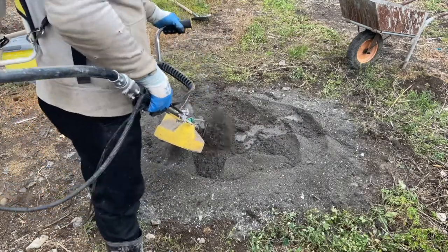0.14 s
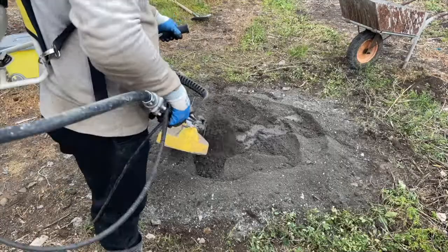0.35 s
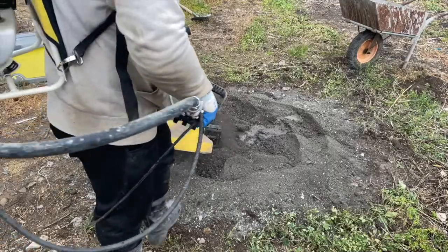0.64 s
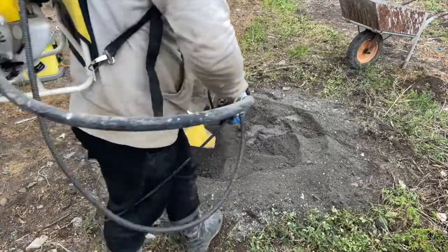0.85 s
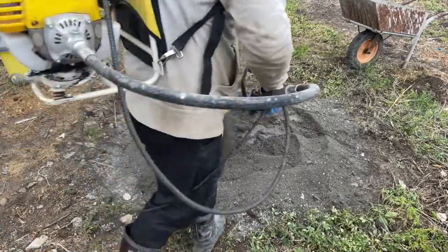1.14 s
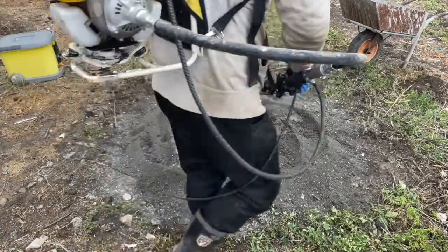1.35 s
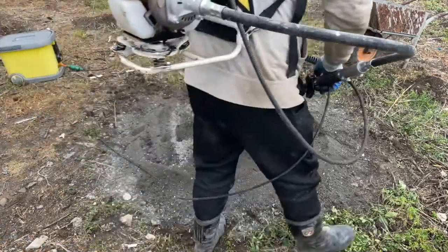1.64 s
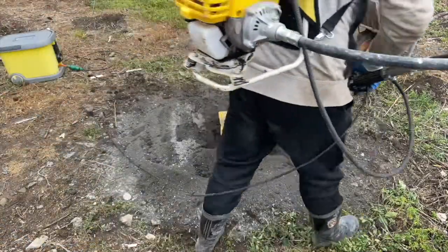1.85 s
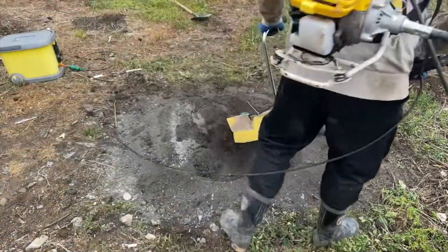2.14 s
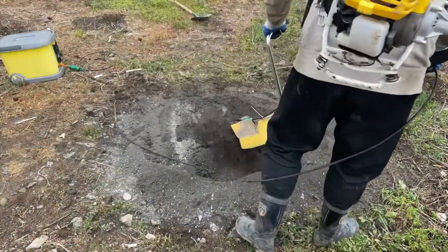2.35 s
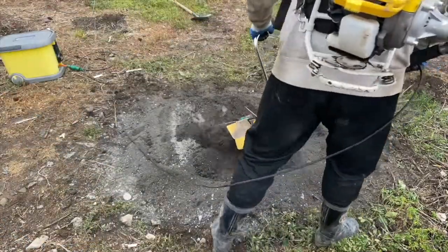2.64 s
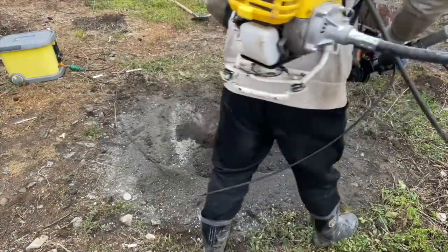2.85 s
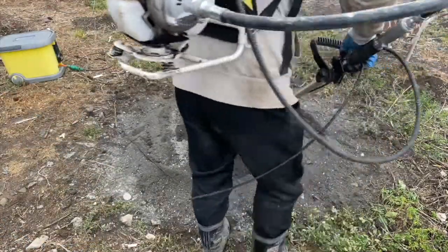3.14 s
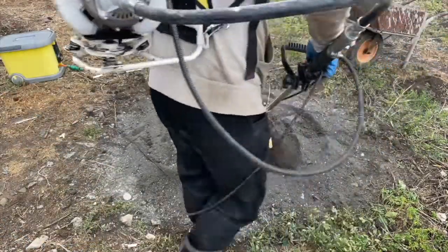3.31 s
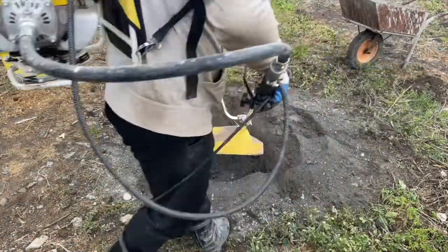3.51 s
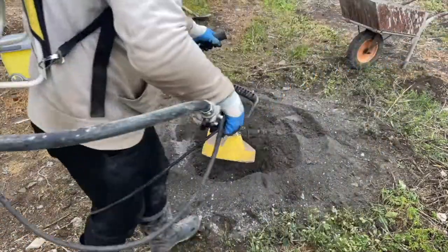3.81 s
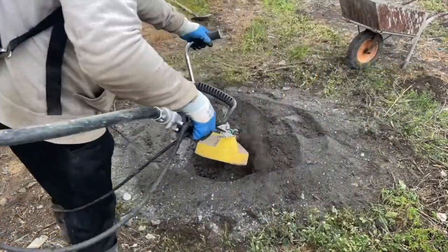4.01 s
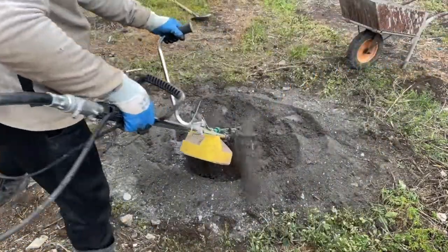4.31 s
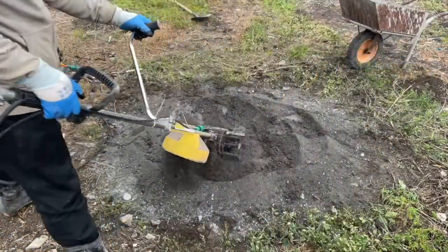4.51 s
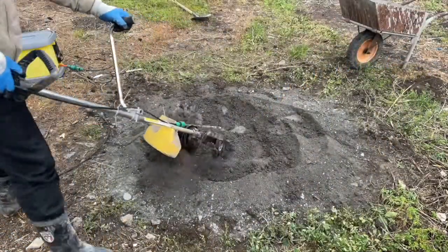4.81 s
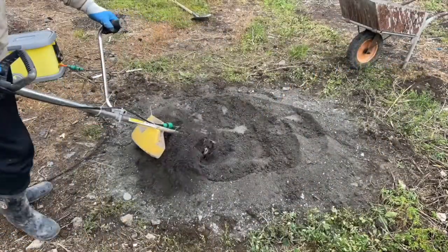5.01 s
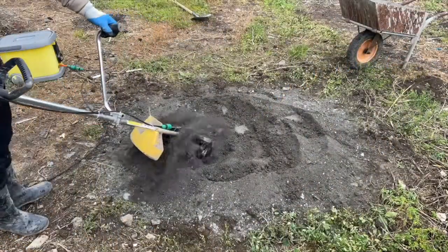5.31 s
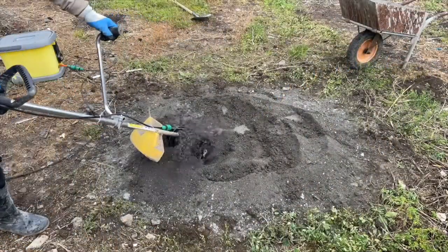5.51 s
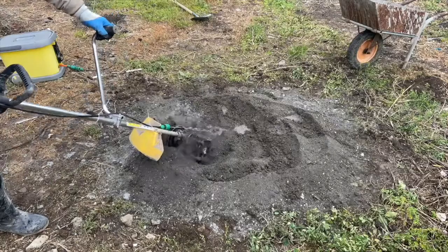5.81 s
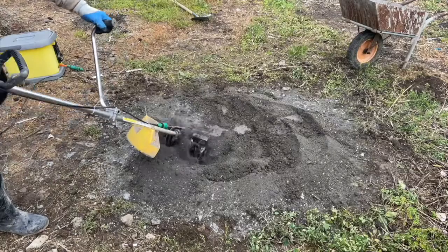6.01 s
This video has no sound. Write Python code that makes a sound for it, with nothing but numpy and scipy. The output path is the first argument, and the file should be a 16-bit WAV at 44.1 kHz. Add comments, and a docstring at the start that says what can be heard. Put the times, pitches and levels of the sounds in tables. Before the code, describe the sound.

A small four-stroke petrol engine on a backpack brush cutter runs for the whole six seconds, outdoors and close to a single microphone. From the start there is a buzzing, rapidly pulsing exhaust over a low rumble, its pitch wavering only slightly under load. Underneath, tiller tines churn dry cement and gravel, making a dense gritty hiss. From about 1 to 3 seconds the engine turns toward the microphone, and fast valve ticking, ringing metal clatter and a thin gear whine come forward, while the grit is at its strongest. Between about 3 and 4 seconds the machine turns away and moves off a little, so the clatter and churning soften and the overall sound gets quieter. From 4 seconds to the end the exhaust drone dominates, a touch higher in pitch, with lighter rattle and the continuing spray of grit.

```python
"""Outdoors, on dry cement and gravel, 0.7 to 1.8 m from a backpack four-stroke brush cutter; one microphone.
The engine drives a tiller head whose tines churn the grit. Each firing rings the muffler and shakes
the frame; valves and piston clatter in the casing; the gears whine. Close in, the worker turns the
engine towards the microphone, then turns it away and steps off, leaving mostly exhaust and grit."""
import sys
import numpy as np
from scipy import signal
from scipy.fft import rfft, irfft, next_fast_len
from scipy.io import wavfile
from scipy.ndimage import uniform_filter1d

SR = 44100
rng = np.random.default_rng(int(sys.argv[2]) if len(sys.argv) > 2 else 0)


def transcribe(signal):
    """Save signal, clipped to [-1, 1], as a 16-bit WAV file at the path in sys.argv[1]."""
    frames = np.atleast_2d(signal).T
    limited = np.clip(frames, -1, 1)
    pcm = np.round(limited * 32767).astype(np.int16)
    wavfile.write(sys.argv[1], SR, pcm)


N = 271215

# Engine speed, sagging as the tines bite. Each row: time in seconds, firing rate in Hz.
ENGINE_SPEED = [(0.0, 44.82), (0.05, 45.48), (0.2, 45.86), (0.49, 47.58), (0.67, 47.11), (0.79, 46.34),
                (0.96, 46.6), (1.08, 47.02), (1.45, 48.1), (1.75, 46.7), (2.23, 47.44), (2.57, 46.3),
                (3.01, 48.27), (3.15, 47.07), (3.87, 48.93), (4.45, 49.09), (4.68, 47.86), (4.86, 48.86),
                (5.07, 47.43), (5.58, 48.17), (5.72, 47.63), (6.15, 47.24)]
# The worker's path. Each row: time in seconds, engine to microphone in metres, turn in degrees
# (0 = side on, 90 = back to the microphone).
WORKER_PATH = [(0, 0.86, -8.5), (.56, 0.89, 8.5), (1.1, 0.84, 28.5), (1.4, 0.72, 47), (1.85, 0.77, 64.5),
               (2.35, 0.74, 97.5), (2.8, 0.91, 75.5), (3.1, 0.97, 62.5), (3.35, 1.26, 43),
               (3.7, 1.61, 16.5), (4.2, 1.44, 6), (4.75, 1.82, -3), (5.3, 1.73, -8), (5.6, 1.63, -0.5),
               (6.15, 1.57, -2.5)]
# The beam of each named engine part. Each entry: gain in dB at 1 m, power of distance it fades with,
# extra dB on axis, direction in degrees, width in degrees.
PART_BEAMS = { "muffler": (-44, 1.5, 6.5, -6, 62), "tailpipe": (-55, 2.2, 12, -4.5, 59.5),
              "outlet": (-60.5, 0.75, 18.5, 12, 34.5), "pop": (-58.5, 0.9, 13.5, 5, 31.5),
              "shaft": (-51, 1.5, 3, 5, 12.5), "crankcase": (-57.5, 3.5, 6, 87, 13),
              "panels": (-38, 1.26, 3, 4, 8.5), "block": (-51.5, 2.5, 14, 20, 23.5),
              "cover": (-50.5, 2, 16.5, 89, 21.5), "housing": (-53.5, 2.5, 13, 73.5, 31),
              "valves": (-47.5, 1.45, 12.5, 42, 48), "gears": (-52, 1, 8.5, 7, 5.5)}

# The frame shaking at 1, 2 and 3 times the firing rate. Each row: a beam as in PART_BEAMS.
SHAKE_BEAMS = [(-50.5, 0.68, 7.5, -19, 21), (-39, 1.05, 5, -16, 5.9), (-40, 1.1, -5, -14, 25)]
# The flexible shaft's rumble at the microphone. Each row: time in seconds, level in dB.
RUMBLE_LEVEL = [(0, -47), (.3, -40), (.55, -44), (.95, -43), (1.4, -41), (1.85, -42), (2.2, -44),
                (2.6, -46), (3.1, -52), (3.6, -49), (4.1, -49), (4.6, -49), (4.85, -54.5), (5.2, -47.5),
                (6.15, -52)]
# Spectra of that rumble and of a firing's five voices. Each row: frequency in Hz, relative level in dB.
RUMBLE_SPECTRUM = [(25, -33), (45, -6.5), (65, 1), (115, 4.5), (160, 3.5), (210, -7.5), (400, -39.5),
                   (900, -37)]
MUFFLER_SPECTRUM = [(133, -40), (190, -14.5), (237, 0.5), (285, -3.5), (335, -6), (385, -38), (520, -27.5),
                    (728, -48.5)]
TAILPIPE_SPECTRUM = [(200, -50.5), (285, -33), (335, 1), (380, -1), (420, 1.5), (470, -3.5), (520, -21.5),
                     (565, -7), (615, -28), (670, -5), (800, -30.5), (1120, -67.5)]
OUTLET_SPECTRUM = [(434, -62), (620, -42), (675, -10), (715, -2.5), (762, 3), (785, -4.5), (815, -22.5),
                   (860, -12), (905, -5), (950, -4.5), (1000, -13), (1400, -27.5)]
POP_SPECTRUM = [(266, -53), (380, -34.5), (435, -12), (520, -0.5), (620, -30), (760, -0.5), (860, -15.5),
                (950, -13), (1100, -4.5), (1200, -9), (1400, -26), (1960, -47.5)]
CRANKCASE_SPECTRUM = [(133, -34), (190, -9.5), (285, -15), (380, -10), (470, -15), (530, -9.5), (580, -8),
                      (680, -9.5), (780, -16.5), (880, -2.5), (1050, -10), (1400, -14), (1960, -25.5)]
# Lift of the bright exhaust pop. Each row: time in seconds, extra gain in dB.
POP_LIFT = [(0, 0.5), (4.1, 2), (4.45, 1.5), (4.65, 2.5), (4.85, 4), (4.96, 0), (6.15, 0.5)]
# A hollow in the exhaust, shifting as the worker turns. Each row: time in seconds, centre in Hz,
# depth in dB.
EXHAUST_DIP = [(0, 338, 27), (.25, 349, 26), (.45, 364, 17), (1.1, 385.5, 6), (1.6, 390.4, 2.5),
               (2.6, 417, 0), (3.7, 374, 4.5), (4.4, 389.9, 13), (4.7, 359.8, 13), (6.15, 360.8, 15)]

# Valve and piston knocks. Each row: place as a share of the engine cycle, relative level in dB.
CYCLE_KNOCKS = [(.06, 5), (0.131, -16), (.37, -2), (.56, -4.5), (.78, -2), (.96, -8)]
# Spectra of panel clatter and valve ticks. Each row: frequency in Hz, relative level in dB.
CLATTER_SPECTRUM = [(200, -19.5), (350, -4.5), (500, -2), (650, 1.5), (800, -2), (1000, -2.5), (1500, -6),
                    (2000, -1.5), (2500, -4), (3000, -7), (4200, -12.5), (7000, -31)]
VALVE_SPECTRUM = [(1500, -5.5), (3000, -1.5), (4000, 2), (4400, 4), (5000, 1.5), (5400, -2), (6000, 3.5),
                  (6750, -2), (7100, -12.5)]
# Rings of the casing and drive tube. Each row: frequency in Hz, width in Hz, relative level in dB.
BLOCK_MODES = [(750, 100, -2.5), (930, 130, -7.5), (1359, 49, 7), (1434, 55, 10), (1710, 110, 1.5),
               (1800, 110, -1), (2210, 170, -0.5), (2300, 70, -7)]
COVER_MODES = [(1495, 23, -1.5), (1702, 61, 3), (2538, 41, 5.5), (2645, 80, 7), (2750, 220, -7.5),
               (3048, 45, 10.5), (3820, 120, -2), (4080, 36, -9), (5230, 50, -5), (5720, 55, -0.5),
               (6126, 51, -0.5), (6600, 91, -6.5)]
HOUSING_MODES = [(2275, 90, 2.5), (3500, 69, 7), (3710, 81, -2), (3990, 46, -4.5), (4365, 45, -11.5),
                 (4820, 74, -6.5), (4850, 64, -6), (5770, 220, -6), (6130, 33, -13.5)]
TUBE_MODES = [(4697, 100, -1), (4840, 44, -2), (5070, 77, -4)]
# Casing rings strongest on one side. Each row: frequency in Hz, width in Hz, a beam as in PART_BEAMS.
SIDE_MODES = [(2083, 82, -61, 2.8, 12, -7.5, 9), (3105, 55, -62.5, 2.3, 18, 52, 7.3),
              (3334, 36, -54.5, 2.6, 9, 47.5, 18), (3500, 39, -59, 3.6, 8.8, 64, 8.3),
              (3860, 110, -54.5, 2.2, 7.8, 24.5, 12), (6110, 19, -57.5, 2.2, 9.3, 47, 5.9),
              (6360, 130, -59, 1.3, 9.1, 19, 13)]

# Gear whines. Each row: multiple of the firing rate, a beam as in PART_BEAMS.
GEAR_WHINES = [(31, -53, 2.0, 8.6, 90, 16), (36, -55, 1.6, 2.3, 72, 34), (49, -56.5, 3.0, 9.5, 86, 24),
               (54, -55.5, 1.0, 16, 110, 22)]
# How hard the tines dig. Each row: time in seconds, level at the microphone in dB.
DIG_LEVEL = [(0, -37), (1.5, -35.5), (2.5, -34.5), (3.2, -43), (3.7, -43.5), (4.2, -41), (4.7, -40.5),
             (5.2, -43.5), (5.6, -41), (6.15, -42)]
# Spectrum of the thrown grit. Each row: frequency in Hz, relative level in dB.
GRIT_SPECTRUM = [(100, -0.5), (400, -8.5), (900, -2), (1500, 1.5), (2400, -0.5), (3300, -1.5), (4700, -8),
                 (5500, -8.5), (7000, -28.5)]


def undb(db):
    """Decibels to gain."""
    return 10 ** (np.asarray(db) / 20)


def unit(x):
    """Scale to rms 1."""
    return x / np.sqrt(np.mean(x ** 2))


def curves(table):
    """The columns of a timed table at every sample."""
    seconds, *columns = np.transpose(table)
    return [np.interp(np.arange(N) / SR, seconds, column) for column in columns]


def noise():
    """White noise."""
    return rng.standard_normal(N)


def wander(rate_hz):
    """Random levels, each held 1 / rate_hz seconds, smoothed twice; rms 1."""
    hold = int(SR / rate_hz)
    steps = noise()[np.arange(N) // hold]
    return unit(uniform_filter1d(uniform_filter1d(steps, hold), hold))


def response(spectrum, f):
    """Gain of a spectrum table at the frequencies f."""
    hz, db = np.transpose(spectrum)
    return undb(np.interp(np.log(f), np.log(hz), db))


def colour(x, spectrum):
    """Filter x by a spectrum table; rms 1."""
    size = next_fast_len(N)
    f = np.maximum(np.fft.rfftfreq(size, 1 / SR), 1)
    return unit(irfft(rfft(x, size) * response(spectrum, f), size)[:N])


def beam_gain(beam, metres, turn):
    """A part fades with distance and swells as its beam sweeps across the microphone."""
    db, falloff, on_axis_db, direction, width = beam
    return undb(db + on_axis_db * np.exp(-((turn - direction) / width) ** 2)) / metres ** falloff


def frame_shake(cycles, metres, turn):
    """Piston and crank shake the frame; the loaded flexible shaft adds an uneven rumble."""
    rumble_db, = curves(RUMBLE_LEVEL)
    out = undb(rumble_db) * colour(noise(), RUMBLE_SPECTRUM)
    for order, beam in enumerate(SHAKE_BEAMS, start=1):
        shake = np.sqrt(2) * np.cos(2 * np.pi * order * (cycles + 0.084))
        out += beam_gain(beam, metres, turn) * shake
    return out


def puff_spectrum(gains, lean):
    """One puff with these gains: at lean 0 it swells as slowly as it dies, at 1 it starts at once."""
    cepstrum = irfft(np.log(gains))
    n = np.arange(len(cepstrum))
    time_sign = np.sign(n) * np.sign(len(n) / 2 - n)
    return np.exp(rfft(cepstrum * (1 + lean * time_sign)))


def exhaust(cycles, gain, size=4096):
    """Each firing thuds through the crankcase, rings muffler and pipe, and pops out."""
    parts = {"muffler": MUFFLER_SPECTRUM, "tailpipe": TAILPIPE_SPECTRUM, "outlet": OUTLET_SPECTRUM,
             "pop": POP_SPECTRUM, "crankcase": CRANKCASE_SPECTRUM}
    bark_lag_s, bark_hz = 0.00291, 381  # the bark above this pitch trails the boom by up to this lag
    chamber_hz, chamber_width_hz = 230, 94  # the chamber fills slowly, so its hum swells between barks
    cycle_place, scatter_db, dip_width_hz = -0.0874, 0.31, 22.6
    f = np.maximum(np.fft.rfftfreq(size, 1 / SR), 1)
    shapes = {part: response(spectrum, f) for part, spectrum in parts.items()}
    dip_hz, dip_db = curves(EXHAUST_DIP)
    bark_delay = np.exp(-2j * np.pi * bark_lag_s * (f - bark_hz * np.arctan(f / bark_hz)))
    chamber_delay = np.exp(-2j * np.arctan(2 * (f - chamber_hz) / chamber_width_hz))
    firings = np.interp(np.arange(1, cycles[-1]) + cycle_place, cycles, np.arange(N))
    strengths = undb(scatter_db * rng.standard_normal(N // 100)) * N / cycles[-1] / np.sqrt(2)
    out, middle = np.zeros(N + size), size // 2
    for at, strength in zip(firings, strengths):
        i = int(at)
        # the colour follows the side that faces the microphone
        at_mic = np.sqrt(sum((gain[part][i] * shapes[part]) ** 2 for part in parts))
        dip = undb(-dip_db[i] * np.exp(-((f - dip_hz[i]) / dip_width_hz) ** 2))
        timing = np.exp(-2j * np.pi * f * (middle + at % 1) / SR)
        puff = puff_spectrum(at_mic * dip, lean=0.39)
        out[i:i + size] += strength * irfft(puff * timing * bark_delay * chamber_delay, size)
    return signal.sosfilt(signal.butter(4, 1600, fs=SR, output="sos"), out[middle:middle + N])


def strikes(cycles, place, scatter_db, jitter_s):
    """One blow at a given place in every cycle, each a little off in strength and time."""
    at = np.interp(np.arange(int(cycles[-1])) + place, cycles, np.arange(N))
    stronger, later = rng.standard_normal((N // 100, 2))[:len(at)].T
    at = np.clip(at + later * jitter_s * SR, 0, N - 2)
    strength = undb(scatter_db * stronger)
    first, share = at.astype(int), at % 1
    return np.bincount(first, strength * (1 - share), N) + np.bincount(first + 1, strength * share, N)


def tail(x, seconds):
    """Give every pulse an exponential tail."""
    return signal.lfilter([1], [1, -np.exp(-1 / (seconds * SR))], x)


def panels(knocks, decay_s, rise_s=0.0008, count=6):
    """A knock spreads over the panels in a dense short ring; their blend drifts at random."""
    t = np.arange(SR // 20) / SR
    rings = rng.standard_normal((count, len(t))) * np.exp(-t / decay_s) * (1 - np.exp(-t / rise_s))
    blend = np.array([wander(rate_hz=3.468) for _ in range(count)])
    blend /= np.sqrt(np.sum(blend ** 2, axis=0))
    return unit(sum(share * signal.oaconvolve(knocks, h)[:N] for share, h in zip(blend, rings)))


def ring(x, modes):
    """Pass x through resonances side by side; rms 1."""
    return unit(sum(undb(db) * signal.lfilter(*signal.iirpeak(hz, hz / width, fs=SR), x)
                    for hz, width, db in modes))


def valves_and_piston(cycles, metres, turn, gain):
    """Valves and piston knock at fixed crank angles; each knock chatters briefly and rings the casing."""
    knocks = sum(undb(db) * strikes(cycles, place, scatter_db=0.5, jitter_s=0.000025)
                 for place, db in CYCLE_KNOCKS)
    chatter = unit(tail(tail(knocks, seconds=0.0028), seconds=0.00089))
    # the slap after the exhaust stroke varies most from cycle to cycle
    slaps = strikes(cycles, place=0.14, scatter_db=1.5, jitter_s=0.00021)
    slap = unit(tail(slaps, seconds=0.0017) * noise())
    blows = unit(knocks) + 0.88 * chatter * noise() + 0.3 * noise()
    rattle = panels(knocks, decay_s=0.016) + 0.37 * slap + 0.36 * (chatter + 0.14) * noise()
    ticks = panels(knocks, decay_s=0.012) + 0.35 * slap + 0.38 * (chatter + 1.3) * noise()
    clatter = gain["panels"] * colour(rattle, CLATTER_SPECTRUM)
    valves = gain["valves"] * colour(ticks, VALVE_SPECTRUM)
    block = gain["block"] * ring(blows, BLOCK_MODES)
    cover = gain["cover"] * ring(blows, COVER_MODES)
    housing = gain["housing"] * ring(blows, HOUSING_MODES)
    tube = gain["shaft"] * ring(blows, TUBE_MODES)
    sides = sum(beam_gain(beam, metres, turn) * ring(blows, [(hz, width, 0)])
                for hz, width, *beam in SIDE_MODES)
    return clatter + valves + block + cover + housing + tube + sides


def gear_whine(cycles, order):
    """Meshing teeth whine at a multiple of the firing rate, unsteady under the load."""
    level = undb(2.2 * wander(rate_hz=13))
    return level * np.sin(2 * np.pi * order * cycles + 0.72 * wander(rate_hz=60))


def tiller(impacts_per_s=5000):
    """Tines throw sand and small stones: dense tiny impacts that surge gently."""
    dig_db, = curves(DIG_LEVEL)
    impacts = (rng.random(N) < impacts_per_s / SR) * noise()
    impacts *= undb(0.62 * np.minimum(rng.exponential(size=N), 4))
    return undb(dig_db + 0.71 * wander(rate_hz=25)) * colour(impacts, GRIT_SPECTRUM)


def scene():
    """Open air, one microphone; the worker's distance and turn set the balance of the engine's parts."""
    firing_hz, = curves(ENGINE_SPEED)
    # one cycle is one firing, two turns of the crank
    cycles = np.cumsum(firing_hz * (1 + 0.00096 * wander(rate_hz=20))) / SR
    metres, turn = curves(WORKER_PATH)
    gain = {part: beam_gain(beam, metres, turn) for part, beam in PART_BEAMS.items()}
    gain["pop"] *= undb(curves(POP_LIFT)[0])
    engine = frame_shake(cycles, metres, turn) + exhaust(cycles, gain)
    engine += valves_and_piston(cycles, metres, turn, gain)
    whine = gain["gears"] * gear_whine(cycles, order=36)
    for order, *beam in GEAR_WHINES:
        whine += beam_gain(beam, metres, turn) * gear_whine(cycles, order)
    return (engine + whine + tiller())[None]


def record(dry):
    """The recorder drops the deepest bass, rounds the loudest peaks and cuts the top steeply."""
    low_cut_hz, ceiling, top_hz = 33, 0.25, 6950
    trimmed = signal.sosfilt(signal.butter(4, low_cut_hz, "high", fs=SR, output="sos"), dry)
    rounded = ceiling * np.tanh(trimmed / ceiling)
    return signal.sosfilt(signal.ellip(12, 0.2, 75, top_hz, fs=SR, output="sos"), rounded)


dry = scene()
out = record(dry)
transcribe(out)
```